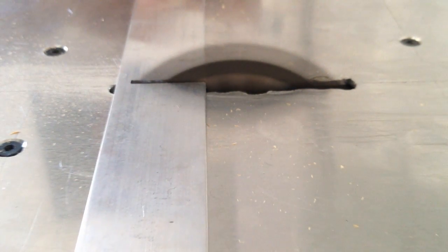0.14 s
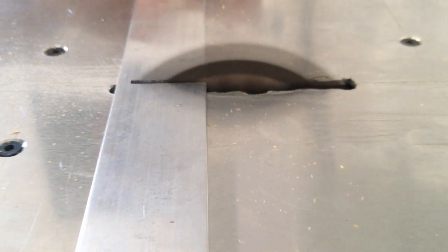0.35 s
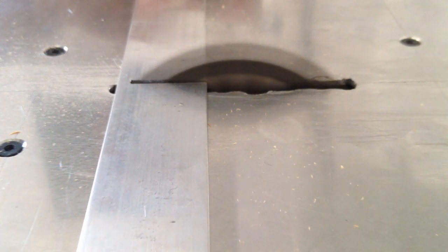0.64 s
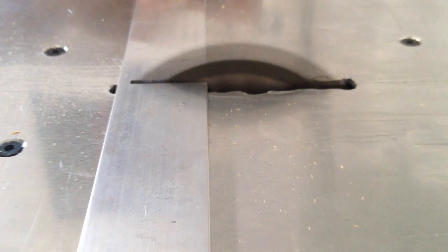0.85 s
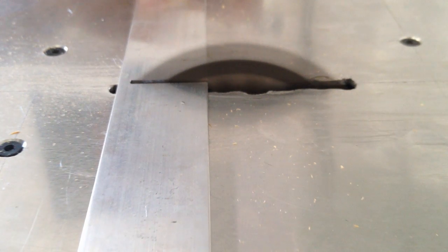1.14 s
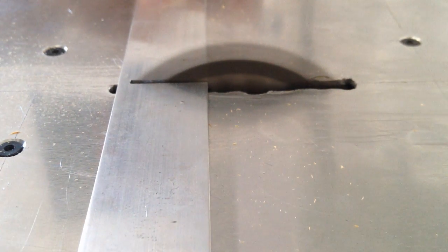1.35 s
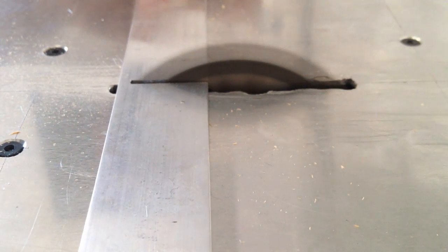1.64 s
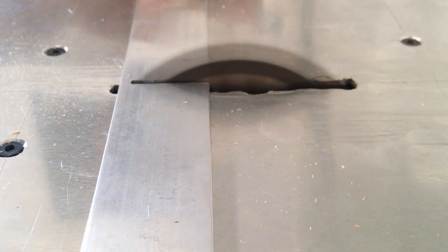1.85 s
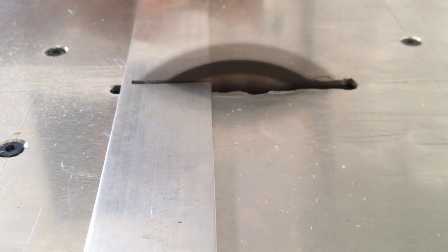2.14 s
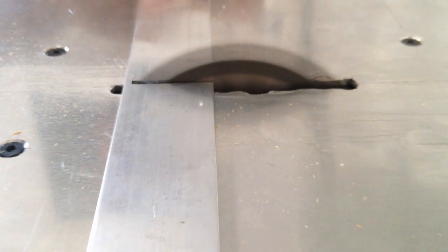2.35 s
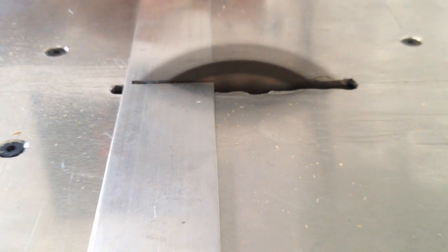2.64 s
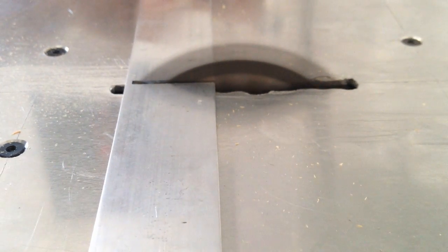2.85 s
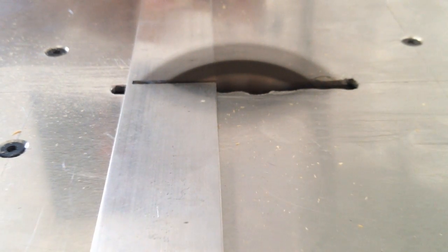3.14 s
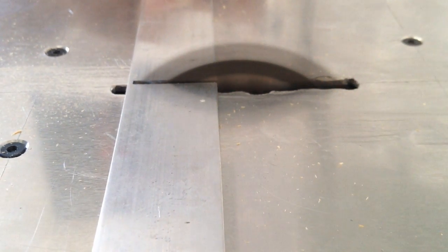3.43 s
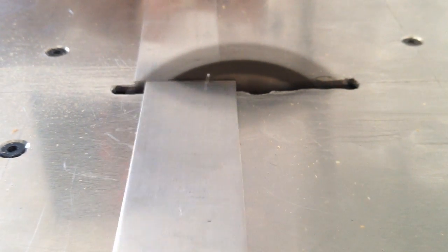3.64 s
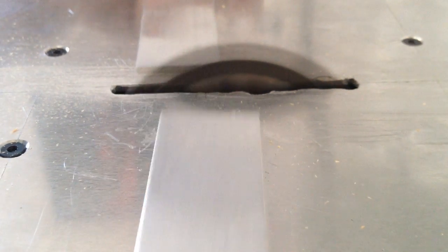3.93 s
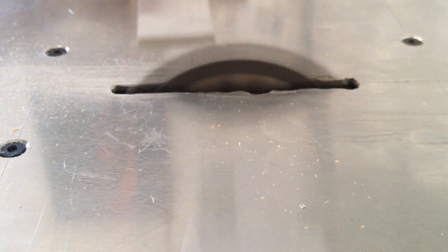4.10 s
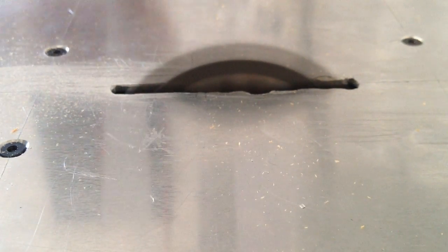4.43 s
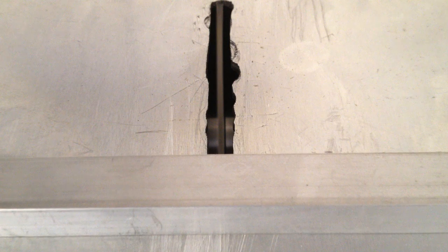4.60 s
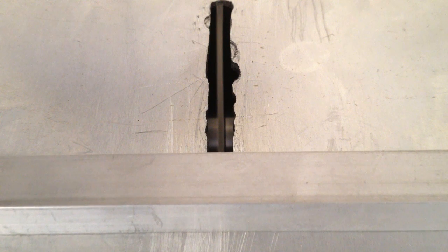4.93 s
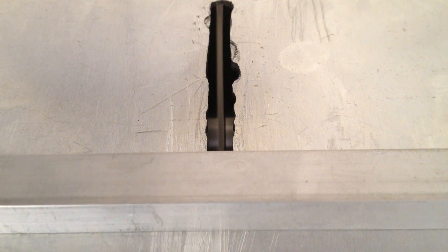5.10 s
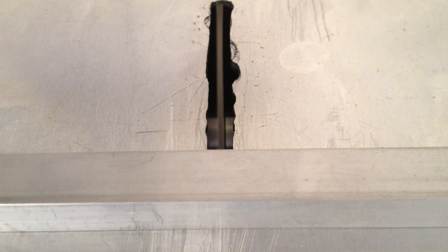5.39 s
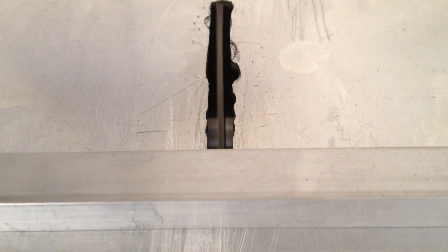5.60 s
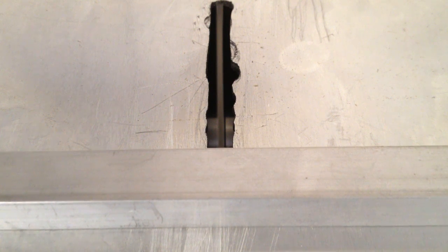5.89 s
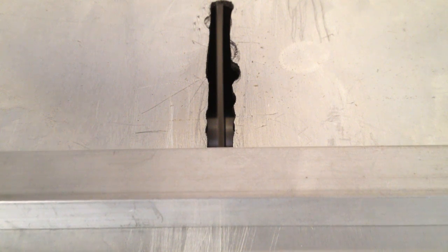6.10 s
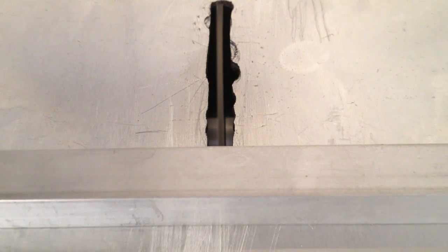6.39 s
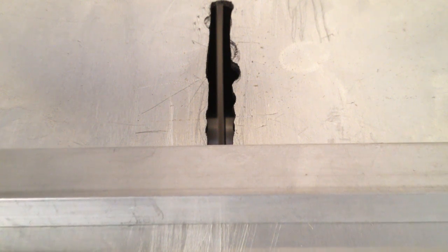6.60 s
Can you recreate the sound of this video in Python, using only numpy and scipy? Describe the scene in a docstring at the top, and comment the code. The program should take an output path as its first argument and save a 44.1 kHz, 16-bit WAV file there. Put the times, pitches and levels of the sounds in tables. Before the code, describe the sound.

A small table saw is already cutting a thin aluminium strip, close by in a workshop with little reverberation. The sound is a bright, fluttering metallic rasp with a piercing whine, over a motor hum and a rush of air. It surges with each push, the pitch sagging and recovering. Teeth snag with sharp cracks around 1.8 seconds, again near 2.8 to 3 seconds, and from 3.4 seconds, when the strip chatters and slaps on the table. At about 3.7 seconds the cut is through, and the freed blade gives a high, fading ring while the quieter motor speeds up. At 4.6 seconds the sound switches abruptly to a second cut, deep in a metal bar. This is a loud, rough, buzzing squeal whose pitch dips around 5.2 seconds, recovers and keeps wavering until the end at about 6.7 seconds.

```python
"""In a workshop, close by, a small homemade table saw with a 24-tooth blade cuts a thin aluminium strip.
The blade runs out of true and bites once a turn, modulating the rasp and whine of its teeth, while the
motor hums and the table top and cabinet resonate. Each push slows the blade, and at last the strip
chatters through. The freed blade rings on and speeds up; then, abruptly, it is deep in a second cut,
squealing in a bar."""
import sys
import numpy as np
from scipy import signal
from scipy.fft import rfft, irfft, next_fast_len
from scipy.io import wavfile
from scipy.ndimage import map_coordinates

SR = 44100
rng = np.random.default_rng(int(sys.argv[2]) if len(sys.argv) > 2 else 0)


def output_pcm(signal):
    """Save a mono or channel-first signal as 16-bit PCM at the path in sys.argv[1].

    Samples are clipped to [-1, 1] before scaling.
    """
    pcm = np.clip(np.atleast_2d(signal).T, -1, 1) * 32767
    wavfile.write(sys.argv[1], SR, np.round(pcm).astype(np.int16))


N = 297675
T = np.arange(N) / SR
TEETH, FREE_SPEED = 24, 84.41  # blade speeds are in turns/s
THROUGH_S, SECOND_CUT_S = 3.72, 4.598

# teeth snagging on the strip: t/s, relative level/dB
SNAG_TIMES = [(1.7579, 2), (1.7714, 0), (1.7844, -1), (1.8347, -2), (2.7711, -1), (2.8494, -1), (2.8898, 0),
              (2.9726, 0), (3.4241, 0), (3.4366, 1), (3.5269, -1), (3.5798, -2), (3.6054, 0), (3.6394, 0),
              (3.6954, 0)]


def amp(db):
    """Amplitude ratio of a level in decibels."""
    return 10 ** (np.asarray(db) / 20)


def unit(x):
    """Normalisation to rms 1."""
    return x / np.sqrt(np.mean(x ** 2) + 1e-20)


def curves(rows):
    """Linear interpolation in time of each column after the first."""
    times, *columns = np.transpose(rows)
    return [np.interp(T, times, column) for column in columns]


def along(points, hz):
    """Interpolation of (f/Hz, value) points on a logarithmic frequency axis."""
    f, values = np.transpose(points)
    return np.interp(np.log(hz + 1), np.log(f), values)


def noise():
    """Gaussian white noise."""
    return rng.standard_normal(N)


def wobble(rate):
    """Smooth random modulation: a spline through `rate` knots a second."""
    return map_coordinates(rng.standard_normal(int(N * rate / SR) + 4), [T * rate])


def filtered(x, response):
    """Linear filtering: the spectrum times a complex frequency response."""
    size = next_fast_len(N + SR // 4)
    return irfft(rfft(x, size) * response(np.fft.rfftfreq(size, 1 / SR)), size)[:N]


def coloured(x, points):
    """Spectral shaping by (f/Hz, level/dB) points, at rms 1."""
    return unit(filtered(x, lambda hz: amp(along(points, hz))))


def resonate(x, modes):
    """Forced response of parallel resonators (f/Hz, bandwidth/Hz, level/dB), at rms 1."""
    def response(f):
        return sum(amp(db) * 1j * f * bw / (f0 * f0 - f * f + 1j * f * bw) for f0, bw, db in modes)
    return unit(filtered(x, response))


def band(x, low_hz, high_hz):
    """Ideal band-pass filtering, at rms 1."""
    return unit(filtered(x, lambda hz: (hz >= low_hz) & (hz < high_hz)))


def strip_feed():
    """Hand pushes add to the strip's steady lean: drags sum directly, levels sum as powers."""
    # the strip leaning on the blade: t/s, drag/(turns/s), scrape level/dB
    lean = [(0, 11, -23.5), (1.1, 4.5, -23.5), (1.65, 0, -26.5), (2.45, 7.5, -24.5), (2.8, 0.3, -23),
            (3.3, 1.47, -29.5), (3.72, 0.5, -25)]
    # pushes: start t/s, end t/s, drag/(turns/s), scrape level/dB, knock level/dB, ring level/dB
    pushes = [(-.1, 0.449, 1.77, -20, -32, -49), (0.472, 0.818, 4.3, -16.5, -32.5, -27),
              (0.896, 1.073, 8.8, -17, -29.5, -26), (1.711, 1.781, 19.4, -15.5, -23, -30),
              (1.818, 1.903, 17.3, -19, -29.5, -35), (2.05, 2.22, 14.7, -17.5, -26.5, -39),
              (2.24, 2.387, 22.3, -17, -27.5, -44), (2.83, 2.9, 26.5, -16.5, -27.5, -44),
              (2.931, 3.03, 20.2, -26, -39, -48), (3.425, 3.56, 14.5, -18.5, -28.5, -35),
              (3.578, 3.707, 25.4, -12.5, -25, -36)]
    attack_s, release_s = .025, .02
    drag, lean_db = curves(lean)
    power = amp([lean_db, lean_db - 16, lean_db - 10.5]) ** 2  # scrape, knock, ring
    for start, end, push_drag, *levels_db in pushes:
        push = np.clip((T - start) / attack_s, 0, 1) * np.exp(-np.maximum(T - end, 0) / release_s)
        drag = drag + push_drag * push
        power = power + amp(levels_db)[:, None] ** 2 * push
    return drag, *(10 * np.log10(power))


def motor_speed(drag, lag_s=.25):
    """Inertia makes the speed sag and recover under drag with a first-order lag."""
    pole = np.exp(-1 / (lag_s * SR))
    return FREE_SPEED - signal.lfilter([1 - pole], [1, -pole], drag, zi=[pole * drag[0]])[0]


def bite(turns, runout_db, rise, scatter_db):
    """Runout modulates the force: once a turn the high side digs in and eases out, never twice alike."""
    lobe = np.interp(turns % 1, [0, rise, 1], [-1, 1, -1])
    strength = rng.standard_normal(1000)[turns.astype(int) % 1000]
    return unit(amp(runout_db * lobe + scatter_db * strength * (lobe + 1) / 2))


def scrape(turns, repeat):
    """Tearing metal is a periodic excitation by the teeth plus a random one by the chips."""
    pattern = rng.standard_normal(256)
    teeth = map_coordinates(pattern, [turns % 1 * len(pattern)], mode="grid-wrap")
    return unit(noise() + repeat * teeth)


def feed_balance(sound, knock_db, scrape_db, fizz_db):
    """Feed pressure sets the spectral balance of tooth knock, scrape and chip fizz."""
    return (amp(knock_db) * band(sound, 0, 3000)
            + amp(scrape_db) * band(sound, 3000, 9500)
            + amp(fizz_db) * band(sound, 9500, SR / 2))


def strip_cut(turns, scrape_db, knock_db, runout_db):
    """Forced vibration: the fluttering strip drives its own and the blade's modes; knocking damps them."""
    # spectrum of the rasp: f/Hz, level/dB
    rasp_spectrum = [(50, -55), (120, -61), (330, -6), (600, -7.5), (1300, -5.5), (1620, -7.5), (1830, 11),
                     (2300, -1), (2800, 0), (4700, -0.5), (5500, -0.5), (8300, 0.5), (9500, -5),
                     (11500, 4.5), (15300, 4)]
    # resonances of blade and strip: f/Hz, bandwidth/Hz, level/dB
    modes = [(3394, 37, -2), (3664, 47, -10), (4606, 64, -5.5), (4767, 113, 0.5), (5890, 37, -7.5),
             (6213, 50, 0), (6318, 56, -2.5), (7130, 38, -5.5), (7940, 37, 0.5), (8470, 110, -7.5),
             (10540, 24, -1.5), (11360, 19, -5), (11980, 200, -9), (12430, 200, -10.5), (13300, 37, 3),
             (14300, 58, -3), (15200, 61, -22)]
    # the hand eases and the strip almost leaves the teeth: t/s, half width/s, level lost/dB
    easings = [(.84, 0.012, 4.5), (1.3, 0.016, 7), (1.98, 0.025, 4.5), (3.255, 0.022, 9)]
    clear = sum((T > s - .009) & (T < s) for s, _ in SNAG_TIMES)  # it springs clear just before a snag
    force = bite(turns, runout_db, rise=.25, scatter_db=1.47)
    force *= amp(.91 * wobble(34.875) + 2 * wobble(900) - 3.8 * clear)
    rasp = coloured(force * scrape(turns, repeat=1), rasp_spectrum)
    ring = resonate(force * noise(), modes)
    ring_share = amp(np.interp(knock_db, [-45, -30, -22], [3.5, 2, -2]))
    metal = (rasp + ring_share * ring) / np.hypot(1, ring_share)
    metal = feed_balance(metal, knock_db + .5, scrape_db - .5, fizz_db=-19 + .8 * (scrape_db + 19.5))
    growl = sum(np.sin(2 * np.pi * k * turns + .79 * wobble(40)) for k in (3, 4, 5))  # the motor labours
    eased_db = sum(db * np.exp(-((T - s) / width) ** 2) for s, width, db in easings)
    contact = np.interp(T - THROUGH_S, [0, .08, .2], [1, .35, 0])
    return contact * (amp(-eased_db) * metal + amp(scrape_db - 30.5) * growl)


def strip_whine(turns, speed, scrape_db, runout_db):
    """The tooth-passing tone grows with pressure; modulation by the uneven bite gives it sidebands."""
    # how well the blade radiates the tone: f/Hz, level/dB
    radiation = [(1540, -17), (1735, -21), (1780, -6), (1830, -1.5), (1890, 0.5), (2000, -2.5)]
    drive_db = np.where(T < THROUGH_S, -21 + .83 * (scrape_db + 20), -48)
    whine_db = along(radiation, TEETH * speed) + drive_db
    force = bite(turns, runout_db, rise=.41, scatter_db=1)
    tooth = 2 * np.pi * TEETH * turns + .014 * runout_db * np.sin(2 * np.pi * turns)
    return amp(whine_db) * force * (np.sin(tooth) + amp(-7) * np.sin(2 * tooth))


def blade_waves(turns, ring_db):
    """Rotation splits each mode into a forward and a backward wave; once the blade is free both ring on,
    beating slowly and fading."""
    # blade modes: f/Hz at rest, nodal diameters, forward level/dB, backward level/dB, beat f/Hz, swell t/s
    modes = [(1889, 3, 0, -10, 6.7, 3.8), (3084, 4, -3, -14, 4, 3.99)]
    unsteady = np.interp(T - THROUGH_S, [0, .08], [1, .12])
    level_db = np.where(T < THROUGH_S, ring_db - 1.5, -28 - 1.5 * (T - THROUGH_S))
    waves = np.zeros(N)
    for hz, diameters, forward_db, backward_db, beat_hz, swell_s in modes:
        beat = 1 + .5 * np.cos(2 * np.pi * beat_hz * (T - swell_s) + unsteady * wobble(2.87))
        swell = beat * amp(unsteady * 2.2 * wobble(24.83))
        phase = 2 * np.pi * hz * T + unsteady * .5 * wobble(24.9)
        spin = 2 * np.pi * diameters * turns
        waves += swell * (amp(forward_db) * np.sin(phase + spin) + amp(backward_db) * np.sin(phase - spin))
    return amp(level_db) * waves


def motor_hum(turns, speed, bar_db):
    """Harmonics of the shaft rate, louder near full speed or under the load of the second cut."""
    # motor harmonics: order, relative level/dB before the second cut, relative level/dB during it
    orders = [(1, -57.5, -66.5), (2, -58, -55.5), (3, -51, -49), (6, -61, -54), (7, -57.5, -52),
              (8, -57, -49), (9, -56, -52), (10, -54, -49), (12, -53.5, -43.5), (13, -46, -40),
              (16, -59, -54), (17, -54, -49), (18, -56, -48), (32, -62, -39.5)]
    loaded = T >= SECOND_CUT_S
    hum = np.zeros(N)
    for order, light_db, load_db in orders:
        level_db = np.where(loaded, load_db, light_db) + 1.274 * wobble(8.2)
        hum += amp(level_db) * np.sin(2 * np.pi * order * turns + .5 * wobble(30))
    return hum * np.where(loaded, amp(-1.5 + .48 * (bar_db + 20.5)), np.minimum(speed / 82, 1) ** 30)


def cabinet_boom():
    """Low resonances of the cabinet: a wavering tone and narrow-band noise swell and fade together."""
    # envelope of the boom: t/s, level/dB
    envelope = [(0.0, -45), (0.19, -38.5), (0.6, -52), (1.05, -35), (1.18, -54), (1.84, -37), (1.95, -50),
                (2.39, -32.5), (2.52, -56), (3.06, -40.5), (3.18, -53), (3.55, -52), (3.61, -31),
                (3.89, -53.5), (4.57, -38.5), (5.0, -53), (5.85, -39), (6.75, -48.5)]
    tone = np.sin(2 * np.pi * 204 * T + .6 * wobble(22))
    rumble = resonate(noise(), [(209, 54, -5.5), (345, 37, -7)])
    rumble = resonate(rumble, [(253, 125, 0)])
    return amp(curves(envelope)[0] + 1.7 * wobble(13)) * (tone + .5 * rumble)


def windage():
    """Air moving round the blade radiates steady broadband noise."""
    # spectrum of the air noise: f/Hz, level/dB
    spectrum = [(40, -108), (100, -29), (200, -6), (500, -17.5), (900, -8), (1300, -13), (2200, -3),
                (3400, -5.5), (3800, -11), (4800, -2.5), (5600, -13), (6500, -1.5), (10000, -13.5),
                (15000, -22)]
    return amp(-34) * coloured(noise(), spectrum)


def table_top(turns, speed, shake_db):
    """Cutting shakes the top; motor orders 11 to 13 drone as they pass through its resonances."""
    # modes of the top: f/Hz, bandwidth/Hz, level/dB
    modes = [(868.8, 19, 3), (903.7, 20, 3.5)]
    shaking = resonate(resonate(noise(), modes), [(871, 110, 0)])
    jitter_rad = np.where((T > THROUGH_S) & (T < SECOND_CUT_S), .12, .9)
    drone = np.zeros(N)
    for order, peak_db, centre_hz in [(11, -27, 916), (12, -32, 862), (13, -31, 905)]:
        gain = amp(peak_db) / np.hypot(1, ((order * speed - centre_hz) / 13) ** 2)
        drone += gain * np.sin(2 * np.pi * order * turns + jitter_rad * wobble(50))
    return amp(-33 + .67 * shake_db + 2.06 * wobble(9)) * shaking + drone


def housing_whistle(turns, speed, order=36, centre_hz=2930, half_width_hz=70):
    """A high motor order whistles as it sweeps through a resonance of the housing."""
    response = 1 / np.hypot(1, (order * speed - centre_hz) / half_width_hz)
    drive_db = np.where(T < SECOND_CUT_S, -39, -47) + 2 * wobble(12)
    return amp(drive_db) * response * np.sin(2 * np.pi * order * turns + .4 * wobble(60))


def impacts(rows, decay_s):
    """Impulsive excitation: noise bursts with sudden onset and exponential decay."""
    return noise() * sum(amp(db) * (T >= s) * np.exp(-np.abs(T - s) / decay_s) for s, db in rows)


def tooth_snags():
    """A snagging tooth is a brief impact, heard as a bright broadband crack."""
    def response(f):
        return 1j * f / (1200 + 1j * f) * 1j * f / (300 + 1j * f) / (1 + 1j * f / 11000)
    return amp(-4.5) * filtered(impacts(SNAG_TIMES, decay_s=.0035), response)


def strip_slaps():
    """The lifted strip falls back on the table: impacts with mostly low-frequency energy."""
    # slaps: t/s, relative level/dB
    slaps = [(2.16, -28), (2.35, -29), (2.377, -25), (2.889, -19), (3.606, -6.5), (3.641, -10),
             (3.681, -8.5), (3.698, -14.5), (3.71, -12.5)]
    bursts = impacts(slaps, decay_s=.006)
    return amp(9.5) * filtered(bursts, lambda f: (1j * f / (35 + 1j * f)) ** 2 / (1 + 1j * f / 700))


def after_ring():
    """Free vibration: once the cut is through, the modes of blade and strip decay exponentially."""
    # freely ringing modes: f/Hz, level/dB, T60/s
    modes = [(4464, -39, 4.9), (4748, -32, .6), (4920, -23.5, 1.8), (5000, -22, 1.6), (5040, -33, 1.5),
             (6240, -32, 4.8), (6360, -35, 2.7), (7009, -33, 0.83), (7260, -42, 4), (7560, -37, 3.5),
             (7903, -17, 0.56), (7906, -47, 2.3), (8360, -35, 2), (8800, -36, 1.8)]
    since = np.maximum(T - THROUGH_S, 0)
    ring = np.zeros(N)
    for hz, db, t60 in modes:
        level_db = db - 60 * since / t60 + 4.2 * wobble(12)
        ring += amp(level_db) * np.sin(2 * np.pi * hz * since + .4 * wobble(40))
    return (ring + shimmer(since)) * (1 - np.exp(-since / .029))


def shimmer(since, fade_db_per_s=13):
    """Many faint high modes of the freed blade decay together for a second, each slowly beating."""
    height, weakness, beat = rng.random((3, 48, 1))
    hz = 4000 * 3.2 ** height
    db = -36.5 - 10 * height - 12 * weakness
    t = since[(since > 0) & (since < 1)]
    cloud = np.sum(amp(db) * np.cos(2 * np.pi * 6 * beat * t) * np.sin(2 * np.pi * hz * t), axis=0)
    return np.interp(since, t, cloud, left=0, right=0) * amp(-fade_db_per_s * since)


def bar_strikes(turns, gap_turns=.195, width_turns=.05, rebound=.55):
    """Inelastic rebound: struck once a turn, the bar bounces on the teeth three more times, ever weaker."""
    pulses = sum(rebound ** k * np.exp(-((turns % 1 - (k + .5) * gap_turns) / width_turns) ** 2)
                 for k in range(4))
    return unit(pulses * amp(2.35 * wobble(60)) + .085)


def bar_cut(turns, scrape_db, runout_db, strikes):
    """Forced vibration: hard regular bites rasp and drive the resonances of blade and bar."""
    # spectrum of the rasp: f/Hz, level/dB
    rasp_spectrum = [(50, -46), (160, -24), (400, -16), (650, -6.5), (1000, -1.5), (1250, -8), (1650, -7),
                     (1920, 9.5), (2300, -3), (3000, -3), (4100, 1.5), (5300, -2.5), (7700, 5.5),
                     (9300, -1), (12500, -7), (14000, 1), (14800, -17)]
    # resonances of blade and bar: f/Hz, bandwidth/Hz, level/dB
    modes = [(2639, 70.3, -6), (4070, 190, -7), (4550, 170, -20), (4801, 100, 0), (5830, 55, 1),
             (6210, 240, 3.5), (7200, 95, -1), (7950, 122.6, -8), (8500, 206, 0.5), (10520, 31, 1.5),
             (11200, 32.6, 4), (12030, 94, 1), (13170, 180, -6), (14000, 35, 8.5)]
    force = unit(bite(turns, runout_db, rise=.11, scatter_db=1.2) + .8 * strikes)
    rasp = coloured(force * scrape(turns, repeat=1.24), rasp_spectrum)
    ring = resonate(force * noise(), modes)
    return feed_balance(rasp + amp(-.5) * ring, scrape_db - 11.5, scrape_db - 2.94, scrape_db - 3.5)


def bar_squeal(turns, speed, strikes):
    """Each strike excites a burst of the fourth tooth harmonic, louder as the load slows the blade."""
    tooth = 2 * np.pi * TEETH * turns + .05 * wobble(300)
    burst = strikes * np.sin(4 * tooth + 1.3 * np.sin(2 * np.pi * turns))
    return amp(np.interp(FREE_SPEED - speed, [2.2, 4.5], [-23, -18]) + 2 * wobble(10)) * burst


def bar_whine(turns, speed, scrape_db, runout_db, strikes):
    """The uneven bite modulates the tooth tone into sidebands; the strikes make its octave screech."""
    angle = 2 * np.pi * turns
    tooth = TEETH * angle + .04 * wobble(300)
    force = unit(amp(.9 * runout_db * np.cos(angle) + 1.7 * np.cos(2 * angle)))
    whine = force * np.sin(tooth + .5 * np.cos(angle) + .2 * wobble(160))
    slowing_db = np.interp(FREE_SPEED - speed, [6, 8.4], [0, 5])
    whine_db = scrape_db - 9 + slowing_db + .71 * wobble(7.7)
    screech = strikes * np.sin(2 * tooth + np.sin(angle) + .15 * wobble(200))
    return amp(whine_db) * whine + amp(-28 + 1.6 * (scrape_db + 17.5)) * screech


def blade_singing(scrape_db):
    """Sustained excitation by the teeth keeps a few high blade modes sounding in the second cut."""
    # singing modes: f/Hz, relative level/dB
    modes = [(4008, -41), (7612, -37), (8000, -40), (8374, -38), (10563, -36), (10753, -40), (11218, -34),
             (13274, -36), (14056, -31)]
    lines = sum(amp(db + 3 * wobble(14)) * np.sin(2 * np.pi * hz * T + wobble(30)) for hz, db in modes)
    return amp(scrape_db + 22.5) * lines


def room(x, t60, wet_db):
    """Workshop reverberation: convolution with exponentially decaying noise."""
    t = np.arange(SR // 2) / SR
    tail = rng.standard_normal(len(t)) * amp(-60 * t / t60) * (t > .004)
    return x + amp(wet_db) * signal.fftconvolve(x, tail / np.linalg.norm(tail))[:N]


def scene():
    """Superposition of the saw's sources; one shaft angle keeps all the rotating ones in step."""
    # feed pressure on the bar: t/s, scrape level/dB, unevenness round a turn/dB
    bar_feed = [(4.62, -14.5, 3), (4.82, -16.5, -3), (4.95, -19.5, 4.5), (5.35, -18.5, 5.5), (5.7, -17, 4),
                (6.19, -17.5, 5), (6.4, -23, 9), (6.5, -19, 7), (6.75, -19, 10.5)]
    # blade speed in the bar: t/s, speed/(turns/s)
    bar_speed = [(4.6, 80.1), (4.82, 81), (4.96, 78), (5.1, 78.3), (5.23, 76), (5.42, 79.3), (5.66, 81.9),
                 (5.87, 81.1), (6.2, 82.6), (6.32, 81), (6.5, 81.6), (6.7, 79.1)]
    second_cut = T >= SECOND_CUT_S
    drag, scrape_db, knock_db, ring_db = strip_feed()
    bar_db, bar_runout_db = curves(bar_feed)
    speed = np.where(second_cut, curves(bar_speed)[0], motor_speed(drag))
    turns = np.cumsum(speed) / SR
    runout_db = 4 + .42 * np.minimum(scrape_db + 34, 3)
    shake_db = np.select([second_cut, T < THROUGH_S], [bar_db + 12, scrape_db + 19], -19)

    strip = strip_cut(turns, scrape_db, knock_db, runout_db)
    strip += strip_whine(turns, speed, scrape_db, runout_db)
    strip += blade_waves(turns, ring_db) + after_ring() + tooth_snags() + strip_slaps()
    strikes = bar_strikes(turns)
    bar = bar_cut(turns, bar_db, bar_runout_db, strikes) + bar_squeal(turns, speed, strikes)
    bar += bar_whine(turns, speed, bar_db, bar_runout_db, strikes) + blade_singing(bar_db)
    machine = motor_hum(turns, speed, bar_db) + cabinet_boom() + windage()
    machine += table_top(turns, speed, shake_db) + housing_whistle(turns, speed)
    return room(np.where(second_cut, bar, strip) + machine, t60=.2, wet_db=-13)[None]


def record(dry):
    """Soft saturation rounds the loudest peaks, and an ideal low-pass limits the bandwidth."""
    rounded = dry[0] / (1 + np.abs(dry[0]) ** 6) ** (1 / 6)
    return filtered(rounded, lambda hz: hz < 15600)[None]


dry = scene()
out = record(dry)
output_pcm(out)
```